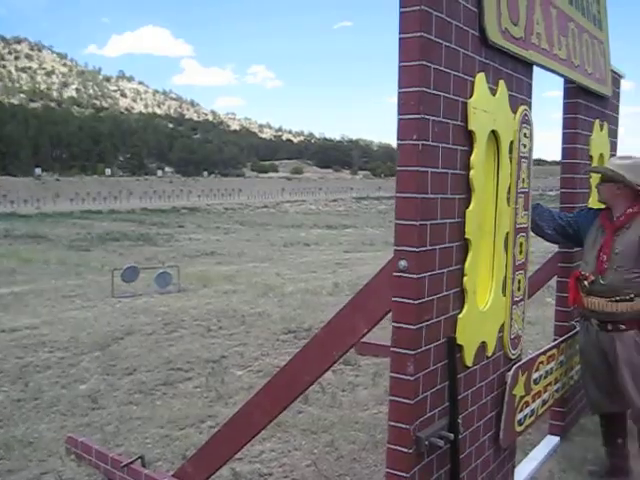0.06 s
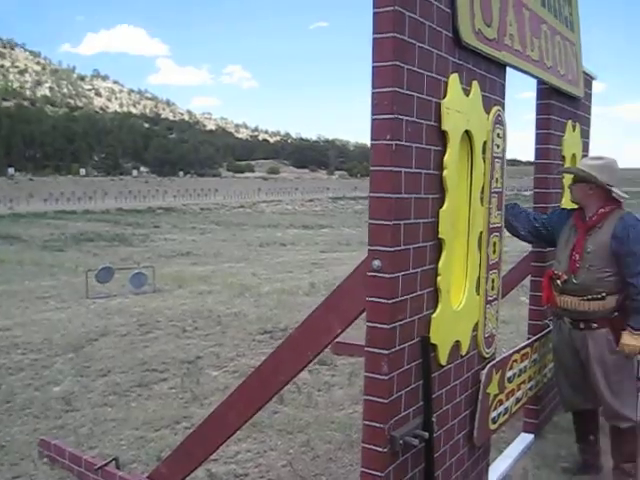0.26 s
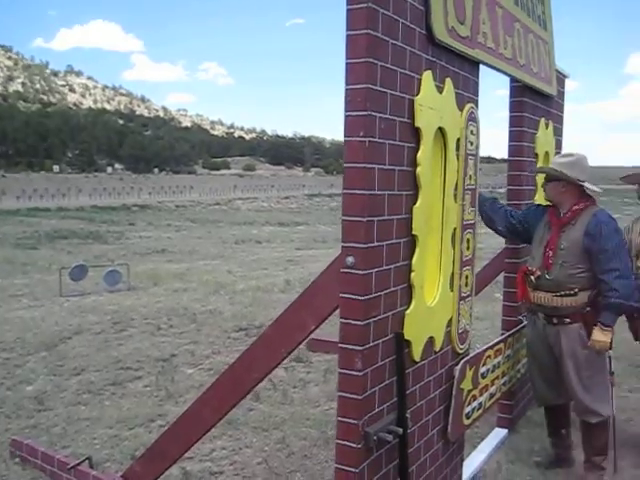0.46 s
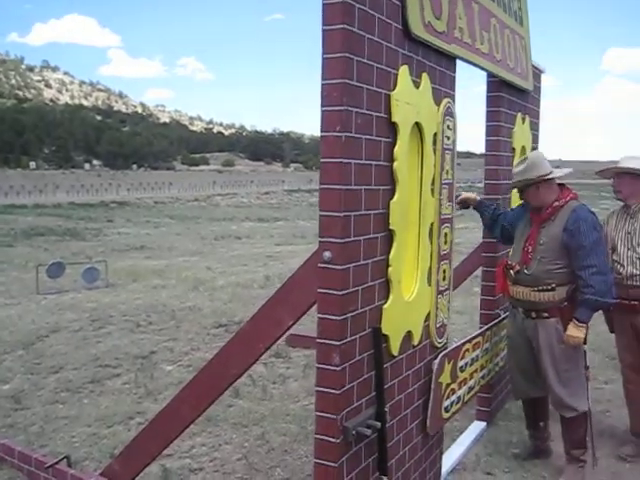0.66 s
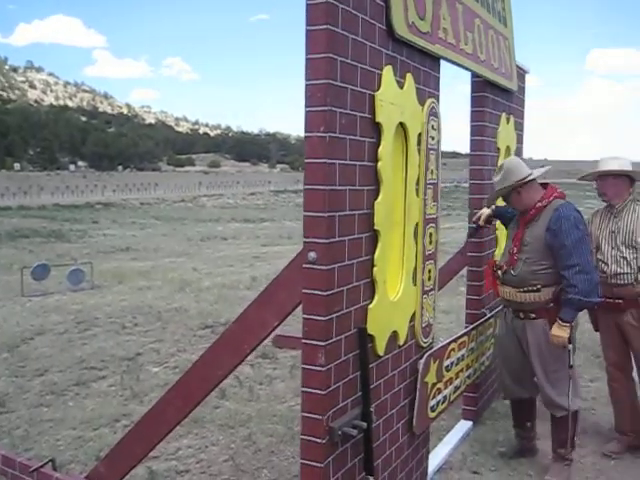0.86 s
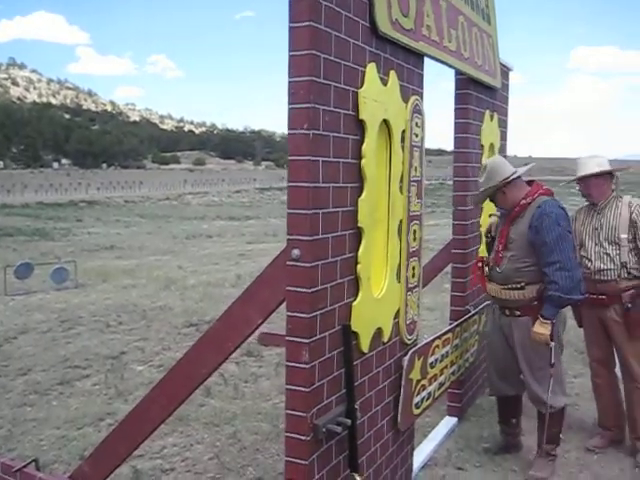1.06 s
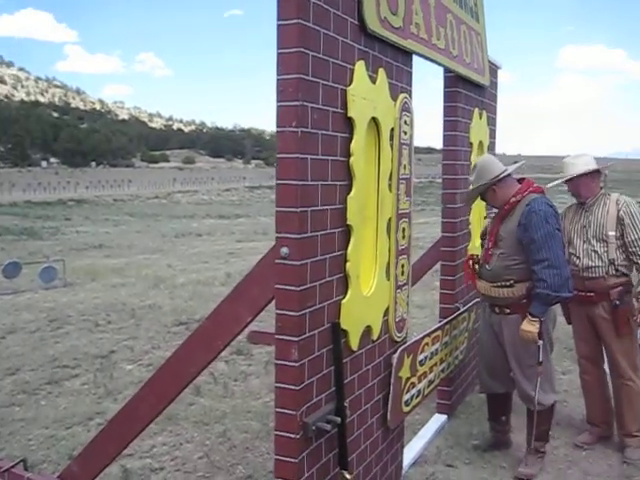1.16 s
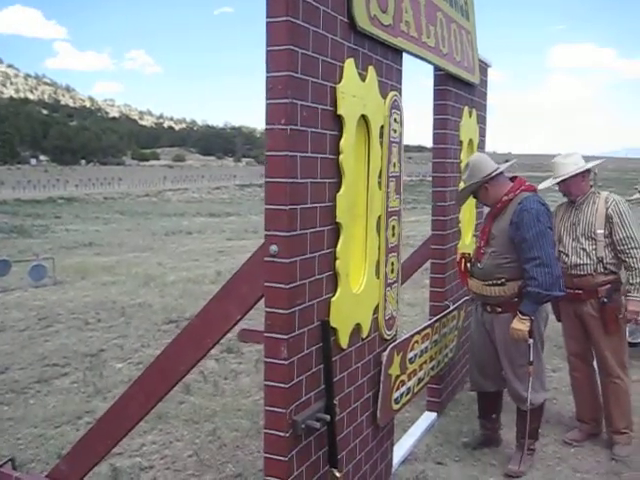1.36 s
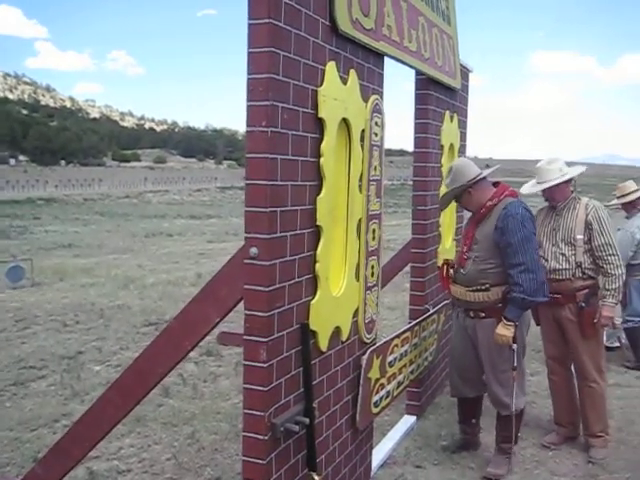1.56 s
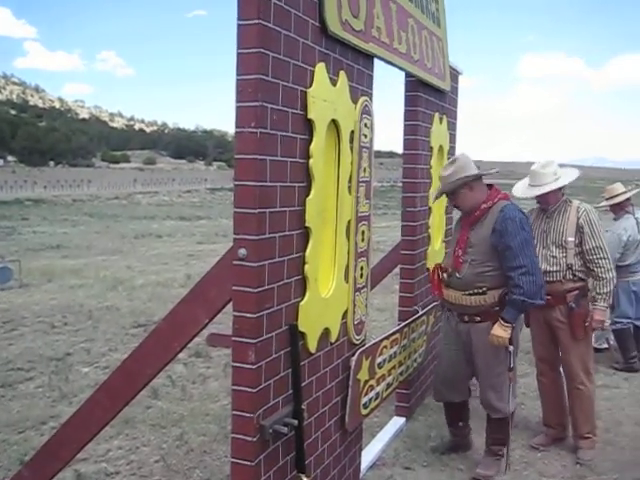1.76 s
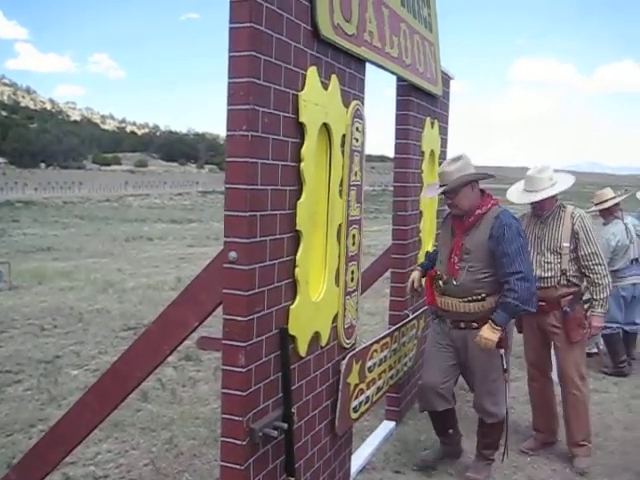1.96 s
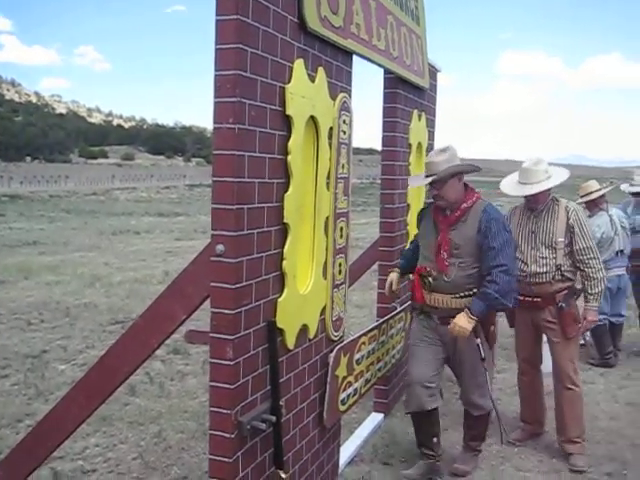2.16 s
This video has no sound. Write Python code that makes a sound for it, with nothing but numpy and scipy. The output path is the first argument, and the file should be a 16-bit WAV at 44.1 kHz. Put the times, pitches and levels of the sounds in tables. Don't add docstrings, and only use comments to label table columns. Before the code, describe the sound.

One revolver shot blasts and overloads a small camera microphone outdoors; a steel plate rings at once, echoes clatter back from posts, trees and a hillside, then metal rattles on wood and faint handling ticks follow.

```python
import sys
import numpy as np
from scipy import signal
from scipy.fft import rfft, irfft
from scipy.io import wavfile
from scipy.ndimage import uniform_filter1d

SR = 44100
rng = np.random.default_rng(int(sys.argv[2]) if len(sys.argv) > 2 else 0)


def to_linear_factor(level_db):
    exponent = np.asarray(level_db, float) / 20
    return 10 ** exponent


def unload_wav(signal):
    wavfile.write(
        sys.argv[1],
        SR,
        np.round(np.clip(np.atleast_2d(signal).T, -1, 1) * 32767).astype(np.int16),
    )


N = 97020
SHOT_S, STRIKE_S = 0.21053, 0.2666

# time_s, gain_db
RECORDER_GAIN = [
    (.212, -2),
    (.222, -17.5),
    (.27, -32.5),
    (.33, -37),
    (.4, -21),
    (.445, -15),
    (.52, -10.5),
    (.6, -8),
    (.72, -3.5),
]


def read(points, hz):
    f, value = np.transpose(points)
    return np.interp(np.log(hz + 1), np.log(f + 1), value)


def curve(points, t):
    return np.interp(t, *np.transpose(points))


def evened(x):
    return x / np.sqrt(np.mean(x ** 2) + 1e-20)


def peaked(db, x):
    return to_linear_factor(db) * x / abs(x).max()


def decay(t, t60):
    return to_linear_factor(-60 * t / t60)


def coloured(x, points):
    response = to_linear_factor(read(points, np.fft.rfftfreq(len(x), 1 / SR)))
    return evened(irfft(rfft(x) * response, len(x)))


def flattened(x):
    z = rfft(x)
    power = abs(z) ** 2
    return irfft(z / np.sqrt(power + 0.068 * np.mean(power)), len(x))


def resonance(x, hz, width, order=3):
    edges = [hz / (1 + width / 2), min(hz * (1 + width / 2), .45 * SR)]
    return signal.sosfilt(signal.butter(order, edges, "bandpass", fs=SR, output="sos"), x)


def slow_noise(length_s):
    size = max(round(length_s * SR), 1)
    return evened(uniform_filter1d(uniform_filter1d(rng.standard_normal(N), size), size))


def add(mix, s, sound):
    part = mix[round(s * SR):][:len(sound)]
    part += sound[:len(part)]


def before_gain(x):
    return x / to_linear_factor(curve(RECORDER_GAIN, np.arange(N) / SR))


def burst(db, hz, t60, width):
    t = np.arange(8192) / SR
    puff = rng.standard_normal(len(t)) * decay(t, t60) * np.minimum(t / 0.00012, 1)
    click = 2 * np.exp(-(t * hz * 8 - 2) ** 2)
    return peaked(db, resonance(puff + click, hz, width))


def air():
    # frequency_hz, density_db
    floor_colour = [(20, -82), (55, -57), (95, 7.5), (140, -4), (330, -13.5), (650, -2.5), (2500, -16),
                    (15700, -32.5), (16200, -60)]
    a, b, patches = rng.standard_normal((N // 256 + 5, 513, 3)).T
    patches = evened(uniform_filter1d(uniform_filter1d(patches, size=10, axis=0), size=10, axis=1))
    level_db = read(floor_colour, np.fft.rfftfreq(1024, 1 / SR))[:, None] + 0.8 * patches
    z = (a + 1j * b) * to_linear_factor(level_db)
    return to_linear_factor(-41) * evened(signal.istft(z, nperseg=1024, noverlap=768)[1][:N])


def groan():
    # start_s, pitch_hz, level_db
    glide = [
        (1.14, 201, -60),
        (1.199, 234.4, -48),
        (1.299, 270, -45.5),
        (1.4, 282.4, -47),
        (1.46, 283, -65),
    ]
    t = np.arange(N) / SR
    s, hz, db = np.transpose(glide)
    phase = 2 * np.pi * np.cumsum(np.interp(t, s, hz)) / SR
    return to_linear_factor(np.interp(t, s, db, -120, -120)) * np.sin(phase)


def rustle():
    hz, width_hz = 3970, 690
    b, a = signal.iirpeak(hz, hz / width_hz, SR)
    noise = evened(signal.lfilter(b, a, rng.standard_normal(N)))
    return before_gain(to_linear_factor(-50.5) * noise * (np.arange(N) / SR > 1.86))


def shuffle():
    start_s, length_s = 1.4, 0.19
    # frequency_hz, density_db
    cloth_colour = [(1200, -3), (2600, 0), (5000, -8), (10000, -15.5), (16000, -44)]
    u = np.clip((np.arange(N) / SR - start_s) / length_s, 0, 1)
    shape = np.sqrt(np.sin(np.pi * u) + 1e-12) * (u < 1)
    return to_linear_factor(-42) * shape * scatter(567, 0.5, cloth_colour)


def thud():
    u = (np.arange(N) / SR - 1.089) / 0.00094
    return before_gain(-to_linear_factor(-20.5) * (1 - 0.96 * u ** 2) * np.exp(-u ** 2 / 2))


def ticks():
    # start_s, peak_db, pitch_hz, t60_s
    gear = [(.0, -28.5, 1340, 0.28), (.0, -25.5, 3530, 0.23), (0.01, -24.5, 3700, 0.045),
            (0.199, -25, 4470, 0.035), (1.27, -43, 5900, 0.023), (1.46, -38, 9070, 0.023),
            (1.504, -45, 9000, 0.021), (1.539, -37, 7800, 0.012), (1.83, -41, 7050, 0.022),
            (1.8566, -30, 9400, 0.013), (1.78, -41, 6000, 0.027), (1.913, -42, 9700, 0.028),
            (1.938, -41, 7940, 0.011), (1.992, -37.5, 7300, 0.022), (2.048, -44.5, 9000, 0.018),
            (2.075, -42.5, 8000, .03)]
    mix = np.zeros(N)
    for s, db, hz, t60 in gear:
        add(mix, s, burst(db, hz, t60, 1.13))
    return before_gain(mix)


def clack():
    t = np.arange(4096) / SR
    return to_linear_factor(-15) * decay(t, 0.05) * np.sin(2 * np.pi * 1240 * t)


def rattles():
    # start_s, peak_db, pitch_hz, hold_s, t60_s
    chatter = [
        (1.2357, -7.5, 2580, 0.0041, .05),
        (1.2604, -24, 2400, 0.0049, .06),
        (1.269, -36, 4200, 0.0033, 0.037),
        (1.322, -24.5, 2180, 0.0068, 0.034),
        (1.336, -26, 2800, 0.0057, 0.097),
        (1.392, -30, 2690, 0.0058, 0.045),
        (1.8578, -24.5, 3720, 0.0024, 0.014),
        (1.867, -31.5, 3320, 0.0098, .03),
        (2.1, -30.5, 415, 0.033, 0.085),
    ]
    mix, t = np.zeros(N), np.arange(8192) / SR
    for s, db, hz, hold, t60 in chatter:
        shape = np.minimum(t / .001, 1) * decay(np.maximum(t - hold, 0), t60)
        puff = resonance(rng.standard_normal(len(t)) * shape, hz, 0.88)
        add(mix, s, peaked(db, puff))
    return before_gain(mix)


def grainy():
    return 1 / (1 + np.exp((np.arange(N) / SR - 1.1) / (.35 / 2))) * .7 + .3


def clumps():
    return to_linear_factor(0.5 * grainy() * slow_noise(0.015))


def scatter(per_s, spread_db, colour):
    size = to_linear_factor(spread_db * np.minimum(rng.exponential(1, N), 4)) * (rng.random(N) < per_s / SR)
    smear = rng.standard_normal(512) * decay(np.arange(512) / SR, 0.01)
    signs = rng.choice([-1., 1.], N)
    clicks = evened(signal.oaconvolve(size * signs, flattened(smear))[:N])
    return coloured(clicks + to_linear_factor(-9) * rng.standard_normal(N), colour)


def hillside():
    # frequency_hz, density_db
    roll_colour = [(150, -44), (320, -12.5), (470, -11.5), (630, 1), (900, -0.5), (1100, -7), (1600, -6.5),
                   (4000, -53)]
    hz, t, z = signal.stft(scatter(700, 5 * grainy(), roll_colour), SR, nperseg=1024)
    loss_db = 11 * np.log2(hz / 900 + .25)[:, None] * np.maximum(t - 1, 0)
    return signal.istft(z * to_linear_factor(-loss_db), SR, nperseg=1024)[1][:N]


def trees():
    # frequency_hz, density_db
    tree_colour = [(300, -38), (850, -8.5), (1500, -8), (2100, -4), (2550, 0), (3100, -5.5), (4800, -12.5),
                   (7000, -25), (14000, -57)]
    # frequency_hz, loss_db_per_s of travel
    air_loss = [(200, -2), (800, -15), (2000, 9.5), (4000, 26), (8000, 74), (16000, 81)]
    hz, t, z = signal.stft(scatter(1800, 4 * grainy(), tree_colour), SR, nperseg=256)
    loss_db = np.maximum(read(air_loss, hz), 0)[:, None] * (t - .5)
    return signal.istft(z * to_linear_factor(-loss_db), SR, nperseg=256)[1][:N]


def slope():
    # time_s, trees_db, hillside_db
    returns = [(.27, -7, -16.5), (.33, -9.5, -6.5), (.39, -14, -11.5), (.45, -11, -19), (.55, -15.5, -37),
               (0.632, -19.5, -43), (0.678, -19.5, -26), (.74, -19.5, -31.5), (0.852, -16.5, -20.5),
               (0.922, -17.5, -21.5), (1.02, -22.5, -26.5), (1.15, -27, -33.5), (1.3, -24, -36),
               (1.45, -38, -31), (1.6, -29.5, -27.5), (1.8, -32, -33), (2.2, -31, -37.5)]
    t = np.arange(N) / SR
    s, trees_db, hill_db = np.transpose(returns)
    near = trees() * clumps() * to_linear_factor(np.interp(t, s, trees_db))
    far = hillside() * clumps() * to_linear_factor(np.interp(t, s, hill_db))
    return (near + far) * (t > STRIKE_S)


def slaps():
    # start_s, peak_db, pitch_hz, t60_s
    slap_events = [(.2475, -16, 1020, .008), (0.2547, -21, 1620, 0.018), (.3405, -23, 1990, .012),
                   (.439, -12.5, 2520, .012), (.5355, -10.5, 1480, 0.0087), (.5435, -7, 2500, .01),
                   (.5485, -9, 2600, .01), (0.6657, -5.5, 2650, 0.0093), (.7365, -9, 1020, 0.039),
                   (0.7634, -9, 2300, .01), (.8025, -14, 870, 0.018), (.810, -12, 1175, 0.026),
                   (.8275, -10, 820, 0.031), (.8535, -18, 1530, 0.01), (.860, -7.5, 870, 0.021),
                   (.874, -17, 895, 0.015), (.898, -18, 860, 0.016), (.9045, -15, 860, 0.049),
                   (1.2348, -8.5, 3440, 0.0071), (1.2905, -28, 7400, 0.074), (1.303, -24, 1390, 0.019),
                   (1.336, -19.5, 870, 0.016), (1.467, -25.5, 1510, 0.022), (1.553, -19, 920, .015),
                   (1.955, -29, 1300, 0.027), (2.02, -33.5, 1990, .015), (1.8566, -23, 4020, 0.02),
                   (2.133, -35, 2230, .02)]
    mix = np.zeros(N)
    for s, db, hz, t60 in slap_events:
        add(mix, s, burst(db, hz, t60, 0.84))
    return before_gain(mix)


def echoes():
    # start_s, peak_db
    faces = [
        (.481, -12),
        (0.5045, -8),
        (0.525, -20),
        (0.574, -8.5),
        (0.6031, -6),
        (.633, -6),
        (0.645, -8),
        (0.648, -12),
    ]
    posts_db = [-7.5, -3.5, -8, -12, -5.5, -7, -2, -6.5, -7.5, -13.5, -20.5, -32]
    # frequency_hz, density_db
    face_colour = [(400, -32.5), (1000, -2.5), (1800, -0.5), (2550, 3.5), (3200, -3.5), (4800, -1.5),
                   (7000, -30), (12000, -53)]
    lead_s, hold_s, t60 = .005, 0.0012, 0.017
    first_post_s, post_step_s = .6612, .01805
    mix, t = np.zeros(N), np.arange(2048) / SR
    posts = [(first_post_s + k * post_step_s, db) for k, db in enumerate(posts_db)]
    hz, colour_db = np.transpose(face_colour)
    for s, db in faces + posts:
        dulled = np.transpose([hz, colour_db - 23.5 * (s - .6) * np.log2(hz / 1000)])
        shape = (t > lead_s) * decay(np.maximum(t - lead_s - hold_s, 0), t60)
        click = 3.8 * (np.round((t - lead_s) * SR) == 8)
        puff = coloured(rng.standard_normal(len(t)) * shape + click, dulled)
        add(mix, s - lead_s, peaked(db, puff))
    return before_gain(mix)


def front():
    t = np.arange(SR) / SR
    rumble = resonance(rng.standard_normal(SR), 278, 0.86, order=2)
    return to_linear_factor(-19) * decay(t, 0.96) * evened(rumble)


def strike():
    # frequency_hz, density_db
    crack_colour = [(120, -51), (200, -35), (3760, 3.5), (4440, -14), (5340, -2), (11200, -24),
                    (16500, -40)]
    t = np.arange(N) / SR
    u = t / .00007 - 3
    snap = -to_linear_factor(28) * np.sin(u) * np.exp(-u ** 2 / 8)
    return snap + to_linear_factor(23.5) * decay(t, 0.012) * coloured(rng.standard_normal(N), crack_colour)


def flutter():
    return to_linear_factor(1.9 * slow_noise(0.0033))


def plate():
    # level_db, t60_s, swell_s
    modes = [(12.5, 0.18, 0.0086), (12, 0.52, 0.21), (15, 0.17, 0.0019), (3.5, 1.186, 0.2),
             (4.5, 0.62, 0.062), (-24, .3, 0.0027), (9.5, 0.44, 0.0022), (-11.5, 0.71, 0.039),
             (-12.5, 0.92, 0.047), (4.5, 0.38, 0.0039), (-5, 0.58, 0.066), (-31, 0.4, .05),
             (-23, 0.61, 0.018), (-1.5, 1, 0.1)]
    modes_hz = [1798, 1846, 4058, 4236, 4270, 6751, 7260, 8546, 8730, 10733, 11022, 11370, 14130, 2508]
    sag, sag_s = .003, .04
    t = np.arange(N) / SR
    bent = t - sag * sag_s * (1 - np.exp(-t / sag_s))
    ring = np.zeros(N)
    for hz, (db, t60, swell) in zip(modes_hz, modes):
        level = to_linear_factor(db) * decay(t, t60) * (1 - np.exp(-(t / swell) ** 2))
        waver = flutter() ** np.minimum(t / 0.21, 1)
        ring += waver * level * np.sin(2 * np.pi * hz * bent)
    swing = np.cos(np.pi * 2.1 * (t + STRIKE_S - .52)) ** 2
    ring += to_linear_factor(-13) * decay(t, 1.6) * swing * np.sin(2 * np.pi * modes_hz[0] * bent)
    return ring * to_linear_factor(-150 * np.maximum(t + STRIKE_S - 1.23, 0))


def shot():
    # frequency_hz, density_db
    blast_colour = [(60, -70), (350, -11.5), (620, -6.5), (900, -1.5), (2000, -6.5), (2700, -2.5),
                    (11300, -24.5), (16500, -53)]
    rise_s, hold_s, dc_s = 0.0032, 0.0047, .011
    t = np.arange(8192) / SR
    after = np.maximum(t - rise_s - hold_s, 0)
    shape = np.minimum(t / rise_s, 1) ** 3 * (decay(after, 0.025) + to_linear_factor(-7) * decay(after, 0.24))
    roar = to_linear_factor(5.5) * shape * coloured(rng.standard_normal(len(t)), blast_colour)
    u = np.maximum(t - rise_s, 0)
    push = -to_linear_factor(6) * decay(u, .045) * np.sin(2 * np.pi * 280 * u)
    pressure = -to_linear_factor(-2) * (u > 0) * (1 - u / dc_s) * np.exp(-u / dc_s)
    sub = to_linear_factor(-5.5) * decay(u, 0.097) * np.sin(2 * np.pi * 30 * u)
    return roar + push + pressure + sub


def scene():
    mix = air() + groan() + rustle() + shuffle() + thud() + ticks() + rattles()
    mix += slope() + slaps() + echoes()
    add(mix, 1.236, clack())
    add(mix, STRIKE_S, front())
    add(mix, STRIKE_S, strike())
    add(mix, STRIKE_S, plate())
    add(mix, SHOT_S, shot())
    return mix[None]


def roll_off(x):
    return signal.sosfilt(signal.butter(12, 16620, fs=SR, output="sos"), x)


def record(dry):
    ducked = dry * to_linear_factor(curve(RECORDER_GAIN, np.arange(N) / SR))
    noisy = ducked + to_linear_factor(-10.5) * air()
    return roll_off(np.clip(noisy, -.71, .71))


dry = scene()
out = record(dry)
unload_wav(out)
```